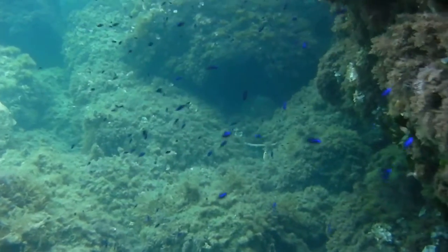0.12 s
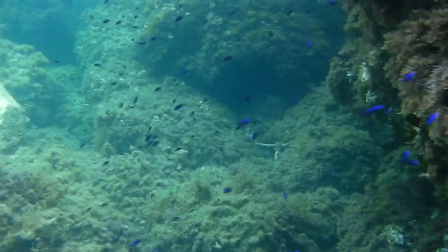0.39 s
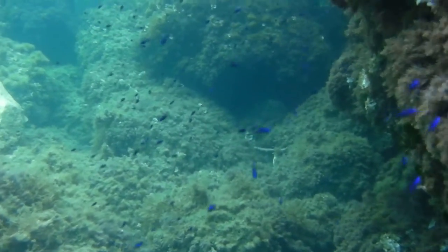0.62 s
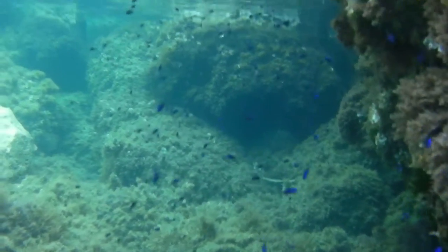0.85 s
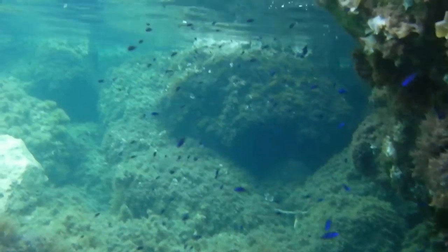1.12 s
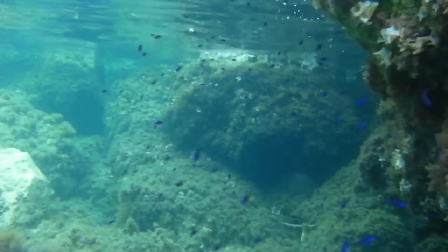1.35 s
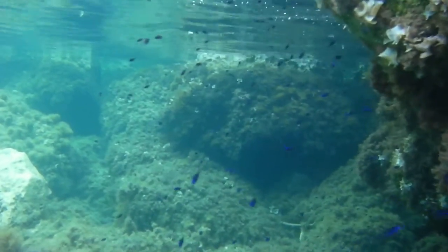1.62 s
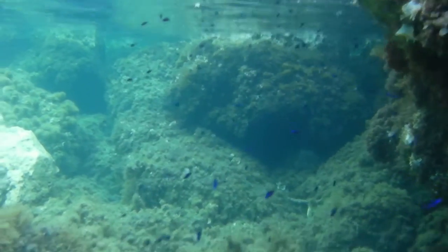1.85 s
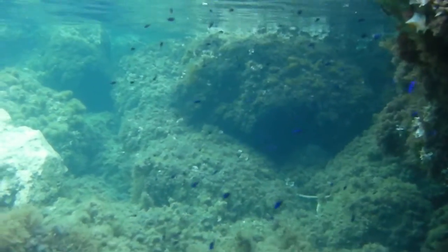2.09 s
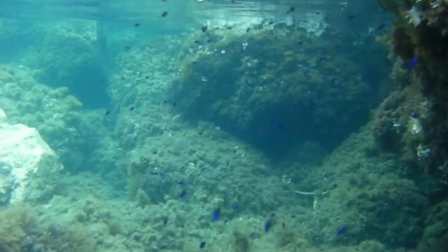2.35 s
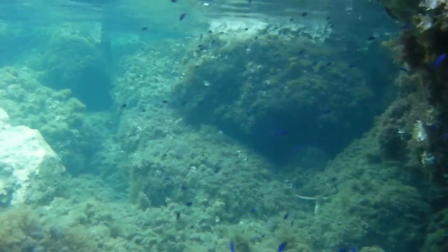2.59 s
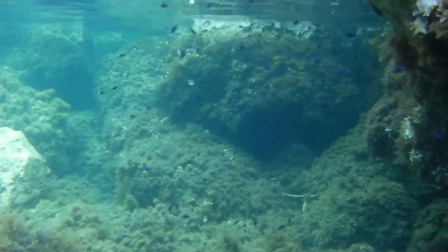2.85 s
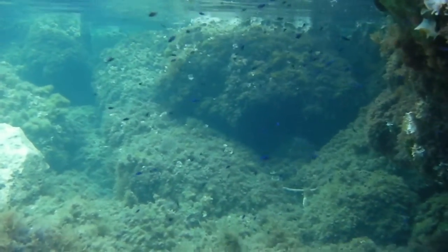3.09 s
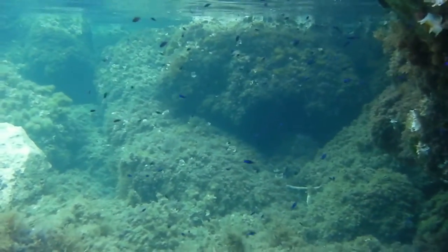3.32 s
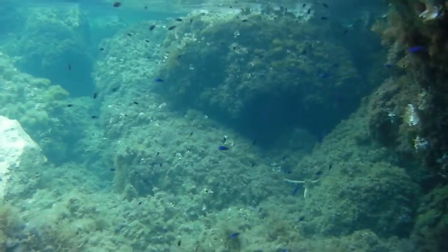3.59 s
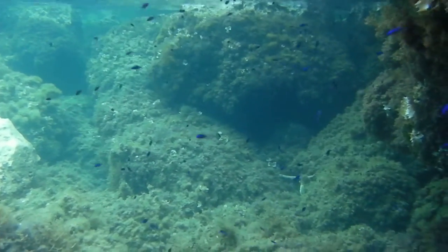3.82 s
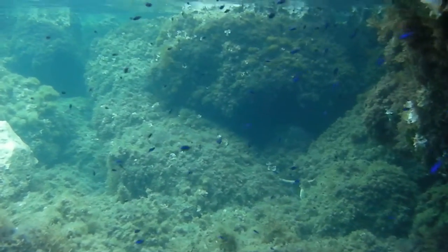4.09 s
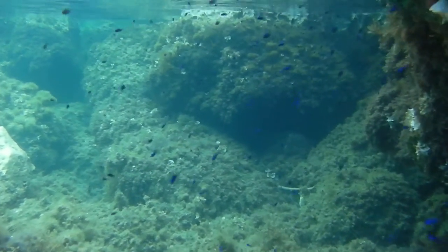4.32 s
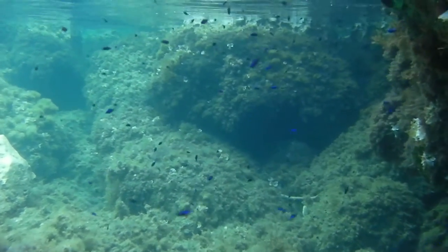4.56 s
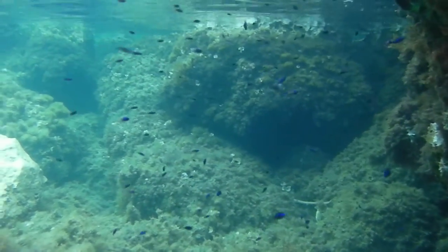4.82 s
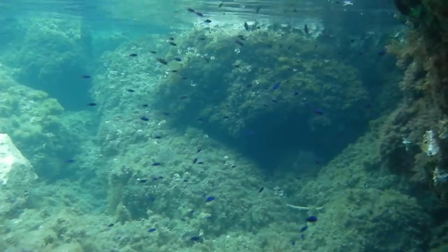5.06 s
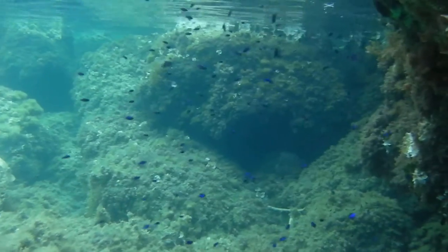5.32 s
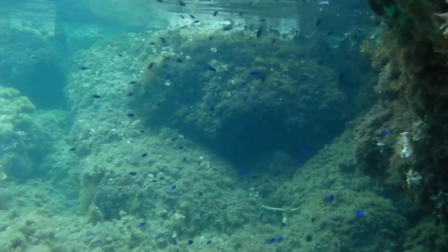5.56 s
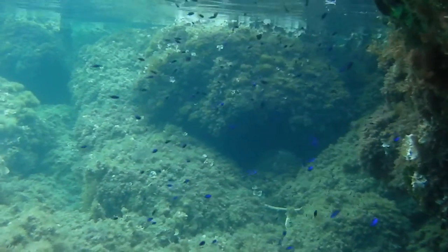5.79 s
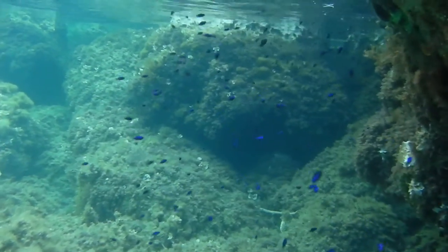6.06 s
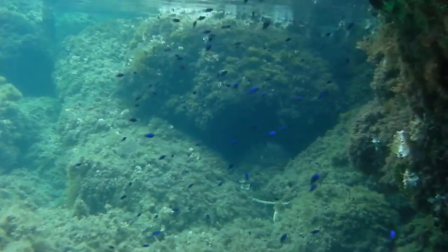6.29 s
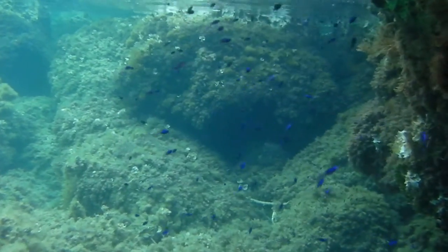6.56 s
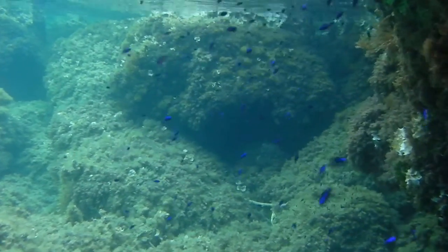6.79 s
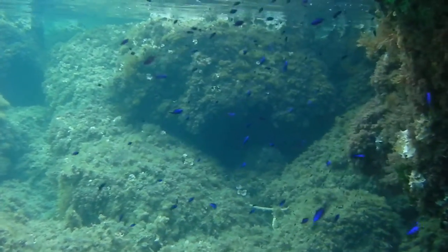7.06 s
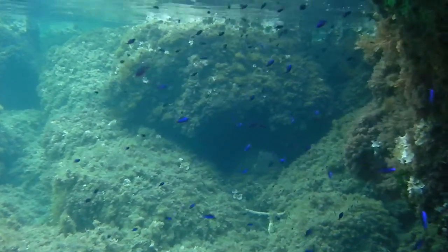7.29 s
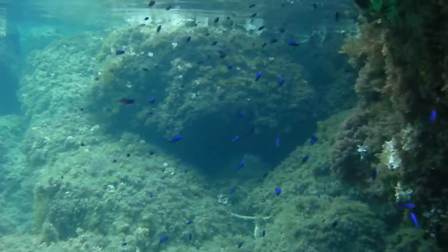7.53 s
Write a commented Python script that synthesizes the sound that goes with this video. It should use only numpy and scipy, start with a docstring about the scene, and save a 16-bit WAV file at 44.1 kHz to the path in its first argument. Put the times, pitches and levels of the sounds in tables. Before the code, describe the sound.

In rocky shallows, an enclosed microphone picks up low boxy rumble, faint surge and hiss. Shrimp pop and crackle, near and far, with short dull echoes, over a quick, uneven mechanical tapping. A few rounded bubble blips sound. One violent, clipped bump with a rough grating rattle interrupts around 2.4 seconds; afterwards the scene grows calmer, with isolated soft knocks and bright snaps to the end. The fish are silent.

```python
"""In shallow sea beside rocks, a small camera hangs in a sealed housing.
Shrimp snaps, water noise and bubbles are heard; snaps and water noise ring the air modes of the housing.
A lens drive steps along with the frame rate, each step a click that sets two modes ringing.
Stronger drive steps and knocks are two swelling sines; one knock overloads, and the case grates around it.
Low thuds are a few slow sine cycles; surge and open-sea hush are coloured noise."""
import sys
import numpy as np
from scipy import signal
from scipy.fft import rfft, irfft, next_fast_len
from scipy.io import wavfile

SR = 44100
rng = np.random.default_rng(int(sys.argv[2]) if len(sys.argv) > 2 else 0)


def file_out(sig):
    """Save sig as 16-bit WAV at sys.argv[1]."""
    # one column per channel
    cols = np.atleast_2d(sig).T
    # limit, then scale
    lim = np.clip(cols, -1, 1)
    pcm = np.round(lim * 32767).astype(np.int16)
    wavfile.write(sys.argv[1], SR, pcm)


def voltage_ratio(decibels):
    """Convert decibels (scalar or array-like) to amplitude ratios, 20 dB per decade."""
    exponent = np.asarray(decibels, float) / 20
    return 10 ** exponent


N = 337806
KNOCK_S = 2.432   # the hard knock

# Air modes of the housing, lowest (the rumble, whose two levels are not used) first. Each row: pitch in Hz,
# time to fall by 60 dB in seconds, relative level in dB for water noise, relative level in dB for a snap.
MODES = [(108, 0.34, -6, -40), (389.6, 0.056, 5.5, -20.5), (774, 0.022, -3, -13.5), (1077, 0.012, -6, -1),
         (1517, 0.012, -7, 5), (2258, 0.0093, -20.5, -1), (2540, 0.015, -40, -9.5),
         (3000, 0.006, -40.5, -6), (4436, 0.0037, -32, 8), (5560, 0.0065, -35, -4),
         (8150, .003, -52.5, -27), (13800, .002, -67.5, -28)]
# Stirring of the case by the water. Each row: time in seconds, level in dB.
STIRRING = [(0, -38), (.6, -36.5), (1.4, -42), (2.33, -43), (2.5, -33.5), (3.1, -40), (4.2, -42.5),
            (5.5, -44.5), (6.6, -42), (7.66, -40.5)]
# Taps: stronger lens drive steps and knocks on the case. Each row: time in seconds, level of the low mode in dB.
TAPS = [(0.009, -27), (0.06, -28), (0.09, -24), (0.138, -24.5), (0.225, -27), (0.275, -24), (0.303, -26.5),
        (0.409, -20), (0.433, -24.5), (0.541, -21.5), (0.574, -27), (0.741, -24.5), (0.889, -20.5),
        (1.01, -24.5), (1.076, -20), (1.266, -23.5), (1.816, -27), (1.846, -27.5), (1.931, -29.5),
        (2.362, -25), (2.38, -7.5), (2.432, 5), (2.464, -16.5), (2.48, -6.5), (2.523, -27.5), (2.612, -25),
        (2.651, -19.5), (2.677, -20), (2.7, -20.5), (2.781, -21), (3.615, -23), (3.662, -27), (3.82, -28.5),
        (4.106, -25.5), (4.356, -24), (4.452, -30.5), (4.656, -30), (4.854, -27.5), (5.178, -22.5),
        (5.455, -24), (5.814, -32.5), (6.058, -29.5), (6.367, -30.5), (6.688, -30), (6.853, -31),
        (6.912, -23), (7.047, -27), (7.181, -25.5), (7.315, -20.5), (7.446, -31), (7.579, -22),
        (7.645, -27)]
# Near shrimp snaps. Each row: time in seconds, level in dB, extra dB for low modes, extra dB for treble.
NEAR_SNAPS = [(0.3646, -25.5, -18, -15.5), (0.6, -27.5, -23, -8.5), (0.6428, -24.5, -5, -8),
              (0.83, -24.5, -19, -34), (0.8864, -35, 9.5, -27), (1.014, -22, -27, -16),
              (1.1001, -23.5, -11, -34), (1.1967, -16, -2, -17), (1.2439, -32.5, 0, -30),
              (1.3728, -28, -27, -28), (1.7568, -26, -4, -41), (1.8872, -18.5, -20, -14),
              (2.0453, -28.5, -22, -31), (2.1755, -30, 2.5, -13), (2.2288, -31.5, -5, -8),
              (2.3017, -29.5, -25.5, -32), (2.4344, -22.5, 13.5, -19), (2.519, -29.5, -21, -25),
              (2.563, -26, -14, -10.5), (2.762, -36, -20, -7), (2.791, -26, -1, -23.5),
              (2.842, -34, -29, -20), (2.874, -24, 1.5, -13.5), (3.0646, -32.5, -6, -10),
              (3.2065, -29, -17, -3.5), (3.2168, -20, -10, -26), (3.249, -32, -16, -8),
              (3.5169, -19, -5, -17), (3.6481, -14.5, 0, -42), (3.9585, -26.5, -7, -28),
              (4.066, -29, -13, -28), (4.4048, -30, -32, -29), (4.6614, -30, -18, -10.5),
              (4.771, -12.5, -6, -11), (5.222, -33, 18.5, -36), (5.3196, -40, 8, -24),
              (5.4116, -29, -1, -16), (5.8482, -23, -5.5, -11), (6.128, -23, -13, -16),
              (6.143, -32.5, -25, -6), (6.2503, -19, -8.5, -48), (6.3131, -27.5, -18, -34),
              (6.3964, -14, -21, -44), (6.4293, -21, -10, -17), (6.641, -27, -34, -9),
              (6.7057, -31.5, -25, -28), (6.8813, -17, -22, -13), (7.098, -25, -22, -15),
              (7.207, -29.5, -22, -9), (7.223, -17.5, -6, -25), (7.2516, -33, -20, -12),
              (7.36, -28, -13, -12)]
# Low thuds, from pushed water and from the knock; the strongest come with the knock.
# Each row: start in seconds, level in dB, pitch in Hz.
THUDS = [(0.035, -28.5, 120), (0.097, -31.5, 70), (0.356, -37, 90), (0.87, -33, 108), (1.039, -35, 79.4),
         (1.844, -26, 146), (2.379, -18.5, 101), (2.428, -12.5, 113), (2.431, -4, 263), (2.606, -28.5, 104),
         (2.679, -27, 99), (2.797, -24, 113), (3.037, -27.5, 114), (3.102, -33.5, 117), (3.378, -34.5, 185),
         (3.388, -27.5, 203), (3.567, -29, 216)]
# Bubbles. Each row: start in seconds, level in dB, starting pitch in Hz, time to fall by 60 dB in seconds.
BUBBLE_TONES = [(0.581, -26.5, 1050, 0.025), (0.611, -38, 1180, 0.037), (2.074, -19.5, 1274, 0.025),
                (2.27, -25, 967, 0.1), (2.584, -29.5, 1360, 0.056), (3.57, -25.5, 263, 0.096),
                (4.362, -26.5, 852, 0.11)]
# Colour of the open water's hush. Each row: pitch in Hz, relative level in dB per Hz.
SEA_COLOUR = [(100, -19), (172, 11.5), (260, -8), (600, 3.5), (1200, -25), (2000, -11), (3500, -15.5),
              (7000, -18), (12000, -71)]
# Colour of the slow surge. Each row: pitch in Hz, relative level in dB per Hz.
SURGE_COLOUR = [(15, -39), (35, -23), (60, -1), (85, -4), (130, -5), (300, -53)]
# Colour of the preamplifier hiss. Each row: pitch in Hz, relative level in dB per Hz.
HISS_COLOUR = [(30, -14), (300, 2), (1000, 0), (3000, 2.5), (7800, 0.5), (9000, 2), (15500, -5.5)]


def seconds(length):
    """Time in seconds at each of so many samples."""
    return np.arange(length) / SR


def rms_one(x):
    """Scale a sound to an rms level of 1."""
    return x / np.sqrt(np.mean(x ** 2) + 1e-20)


def drift(rate_hz):
    """Slow random wandering of rms 1: noise smoothed twice, worked out at every 40th sample."""
    r = np.exp(-80 * np.pi * rate_hz / SR)
    slow = signal.lfilter([1], [1, -2 * r, r * r], rng.standard_normal(N // 40 + 2002))
    slow = rms_one(slow[2000:])   # skip the filter's start
    return np.interp(np.arange(N) / 40, np.arange(len(slow)), slow)


def ring(clicks, hz, t60):
    """A resonance: a unit click starts a sine of height 1 that falls by 60 dB in t60 seconds."""
    r = voltage_ratio(-60 / (t60 * SR))
    w = 2 * np.pi * hz / SR
    return signal.lfilter([0, np.sin(w)], [1, -2 * r * np.cos(w), r * r], clicks + 1e-18)


def coloured(spectrum, channels):
    """Noise of rms 1, given its colour by weighting each pitch of its spectrum."""
    size = next_fast_len(N)
    hz = np.maximum(np.arange(size // 2 + 1) * SR / size, 1)
    point_hz, point_db = np.array(spectrum).T
    weight = voltage_ratio(np.interp(np.log(hz), np.log(point_hz), point_db))
    noise = rng.standard_normal((channels, size))
    return rms_one(irfft(rfft(noise) * weight, size)[:, :N])


def add(out, s, sound):
    """Mix a short sound in at time s."""
    i = max(round(s * SR), 0)
    out[..., i:i + sound.shape[-1]] += sound[..., :N - i]


def swell(t, peak_s):
    """A mode fed through other resonances builds up, peaks at 1 and dies."""
    return (t / peak_s * np.exp(1 - t / peak_s)) ** 2.45


def sea(swing_db):
    """The hush of the open water is coloured noise that follows the stirring very slightly."""
    return voltage_ratio(-53 + 0.067 * swing_db) * coloured(SEA_COLOUR, channels=1)


def surge(swing_db):
    """Deep coloured noise wavers, fades slowly and partly follows the stirring."""
    fade_db_per_s = 1.2
    level_db = -53.5 - fade_db_per_s * seconds(N) + 0.15 * swing_db
    return voltage_ratio(level_db + 3 * drift(6)) * coloured(SURGE_COLOUR, channels=1)


def rumble():
    """Plain noise rings the lowest air mode; the knock raises it, then it settles slowly."""
    jolt_db, settle_s = 7.5, 3.3
    t = seconds(N)
    jolt = (t > KNOCK_S) * np.exp(-np.abs(t - KNOCK_S) / settle_s)
    sound = rms_one(ring(rng.standard_normal(N), *MODES[0][:2]))
    return voltage_ratio(-52.5 + jolt_db * jolt) * sound


def water():
    """Lumpy noise rings the higher air modes, each wavering on its own."""
    lumps = voltage_ratio(2.5 * drift(42.0))
    hum = np.zeros(N)
    for hz, t60, db, _ in MODES[1:]:
        mode = rms_one(ring(lumps * rng.standard_normal(N), hz, t60))
        hum += voltage_ratio(db + 2.0 * drift(5.7)) * mode
    return voltage_ratio(-1.5) * rms_one(hum)


def drive():
    """The lens drive makes small uneven steps, one a frame, every second one stronger on average."""
    frame_s, first_s, late_s = 1 / 29.97, .0065, 0.00195
    count = int(N / SR / frame_s)
    draws = rng.standard_normal((count, 3))
    at = (first_s + frame_s * np.arange(count) + late_s * np.abs(draws[:, 0])) * SR
    step_db = 6 * np.clip(draws[:, 1], -3, 1.3) - 0.8 * (np.arange(count) % 2)
    steps = np.zeros(N)
    steps[at.astype(int)] = voltage_ratio(step_db) * np.sign(draws[:, 2])
    # ringing twice makes each mode build up before it dies
    low_hz, over_hz = MODES[1][0], MODES[2][0]
    low = ring(ring(steps, low_hz, 0.052), low_hz, 0.052)
    over = ring(ring(steps, over_hz, 0.035), over_hz, 0.035)
    return voltage_ratio(-5) * (rms_one(low) + voltage_ratio(-13.0) * rms_one(over))


def thuds():
    """Pushed water or the knock gives a low thud: a few slow cycles that swell and die."""
    out, t = np.zeros(N), seconds(round(.2 * SR))
    for s, db, hz in THUDS:
        add(out, s, voltage_ratio(db) * swell(t, 0.76 / hz) * np.sin(2 * np.pi * hz * t))
    return out


def bubbles():
    """A bubble is a dying sine that rises a little in pitch."""
    rise_per_s = 2.3   # as a share of the starting pitch
    out, t = np.zeros(N), seconds(round(.15 * SR))
    cycles_per_hz = t + rise_per_s * t ** 2 / 2
    for s, db, hz, t60 in BUBBLE_TONES:
        envelope = (1 - np.exp(-t / 0.00072)) * voltage_ratio(db - 60 * t / t60)
        add(out, s, envelope * np.sin(2 * np.pi * hz * cycles_per_hz))
    return out


def far_crackle():
    """Distant snaps come by chance, in thicker and thinner spells; gives rows like the near ones."""
    per_s = 45 * voltage_ratio(3.5 * drift(2.5))
    born = np.flatnonzero(rng.random(N) < per_s / SR)
    db = -47.5 + 5 * np.minimum(rng.exponential(1, len(born)), 2.4)
    colour_db = np.array([-10, -24]) + 7 * rng.standard_normal((len(born), 2))
    return np.column_stack([born / SR, db, colour_db])


def snaps():
    """Each snap strikes the modes in its own colour, treble first; dull echoes off rock follow in milliseconds."""
    wall_lag_cycles, wall_lead_s = 3.5, .0016   # the wall passes each mode some cycles late
    echo_gap_s, echo_first_db, echo_loss_db = .0017, -8, 3.5
    s, db, low_db, high_db = np.vstack([NEAR_SNAPS, far_crackle()]).T
    # how unevenly a snap strikes the modes: near ones less, far ones more
    uneven_db = np.where(np.arange(len(s)) < len(NEAR_SNAPS), 2.5, 4.5)
    draws = rng.standard_normal((len(s), len(MODES)))
    echoes = rng.random((len(s), 6))
    middle_db = -6 + 0.24 * low_db + 4 * draws[:, -1]
    out = np.zeros((2, N))
    for k, (hz, t60, _, mode_db) in enumerate(MODES[1:]):
        if hz < 1400:
            colour_db = low_db
        elif hz < 1800:
            colour_db = middle_db
        else:
            colour_db = 0 if hz < 3500 else high_db
        strike_db = db + mode_db + colour_db + uneven_db * np.clip(draws[:, k], -3, 1.5)
        size = voltage_ratio(strike_db) * (-1) ** k
        at = ((s - wall_lead_s + wall_lag_cycles / hz) * SR).astype(int)
        clicks = np.zeros(N + SR)
        clicks[at] = size
        dulling = min(2500 / hz, 1)
        for j in range(6):
            echo_db = echo_first_db - echo_loss_db * j + 2.5 * np.clip(draws[:, j - k], -2, 2)
            gain = voltage_ratio(echo_db) * (-1) ** (j + 1)
            later = (SR * echo_gap_s * (j + .6 + echoes[:, j])).astype(int)
            clicks[at + later] += gain * size * dulling
        # a push of about a third of a cycle, not a point
        push = .35 * SR / hz
        clicks = np.convolve(clicks, np.ones(max(int(push), 1)))[:N] / push
        # short waves tell the two microphone ports apart
        lean_db = -2.5 * min(hz / 2500, 1) ** 2 * (1 if hz < 3500 else -.4)
        out += ring(clicks, hz, t60) * voltage_ratio([[-lean_db / 2], [lean_db / 2]])
    return out


def grating():
    """The case grates against something: dense uneven contacts ring four air modes, easing off after the knock."""
    start_s, attack_s, end_s, release_s = 2.361, 0.0041, 2.8, .2
    drop_db, drop_s, fade_db_per_s = 6.5, 0.033, 26
    t = seconds(N)
    fade_in = np.clip((t - start_s) / attack_s, 0, 1)
    fade_out = np.clip(1 - (t - end_s) / release_s, 0, 1) ** 2
    after = np.maximum(t - KNOCK_S, 0)
    level_db = -23.5 - drop_db * np.minimum(after / drop_s, 1) - fade_db_per_s * after
    contacts = rng.standard_normal(N) * (rng.random(N) < 800 / SR)   # about 800 a second
    rings = np.zeros(N)
    for (hz, t60, _, _), db in zip(MODES[1:], (13.5, 6.5, -5.5, -43.5)):
        waver_db = 3 * np.clip(drift(28), -2, 1.5)
        rings += voltage_ratio(db + waver_db) * rms_one(ring(contacts, hz, t60))
    return fade_in * fade_out * voltage_ratio(level_db) * rms_one(rings)


def taps():
    """A drive step or a knock reaches the air inside: a low mode swells, the next one answers shorter."""
    out, t = np.zeros(N), seconds(round(.12 * SR))
    draws = rng.random((len(TAPS), 5))
    for (s, db), (a, b, c, d, e) in zip(TAPS, draws):
        # softer taps swell quicker
        peak_s = (.0095 + .00007 * db) * (1 + .1 * (2 * d - 1))
        hz = MODES[1][0] + 24 * (c - .6)
        # harder taps ring purer
        over_db = -21.5 - 0.2 * db + 13 * (e - .5)
        low = swell(t, peak_s) * np.sin(2 * np.pi * (hz * t + a))
        over = swell(t, 0.6 * peak_s) * np.sin(2 * np.pi * (MODES[2][0] * t + b))
        add(out, s - .004, voltage_ratio(db) * (low + voltage_ratio(over_db) * over))
    return out


def scene():
    """Mix all the sources; the stirring sets the level of both the water hum and the small drive steps."""
    stir_s, stir_db = np.transpose(STIRRING)
    water_db = np.interp(seconds(N), stir_s, stir_db)
    swing_db = water_db - water_db.mean()
    background = sea(swing_db) + surge(swing_db) + rumble()
    stirred = voltage_ratio(water_db) * (water() + drive())
    return background + stirred + thuds() + bubbles() + snaps() + grating() + taps()


def roll_off(x):
    """The treble ends steeply here."""
    return signal.sosfilt(signal.butter(12, 16640, fs=SR, output="sos"), x)


def record(dry):
    """Each preamplifier hisses on its own, a faint line tone leaks in, the bass is cut, peaks are cut flat."""
    whine = voltage_ratio(-88) * np.sin(2 * np.pi * 15734 * seconds(N))
    hiss = voltage_ratio(-57.5) * coloured(HISS_COLOUR, channels=2)
    mix = dry * voltage_ratio([[0], [.3]]) + hiss + whine   # the right side is a touch louder
    mix = signal.sosfilt(signal.butter(3, 38, "high", fs=SR, output="sos"), mix)
    mix = np.clip(mix, -1.0, 1.0)   # overload
    return roll_off(mix)


dry = scene()
out = record(dry)
file_out(out)
```